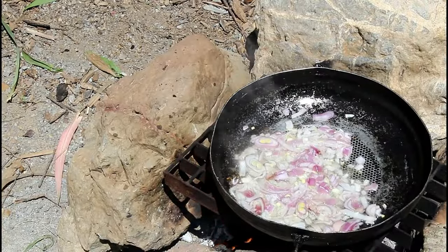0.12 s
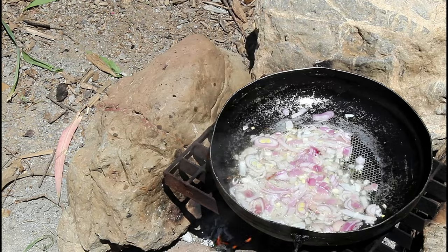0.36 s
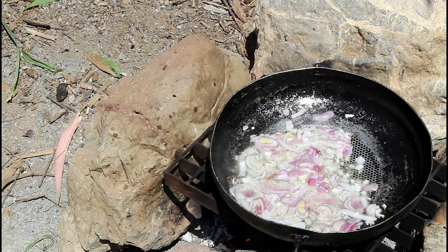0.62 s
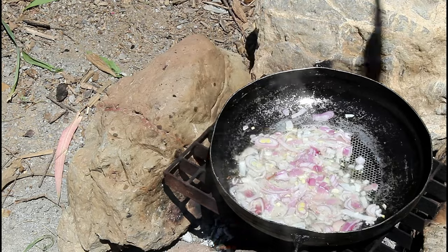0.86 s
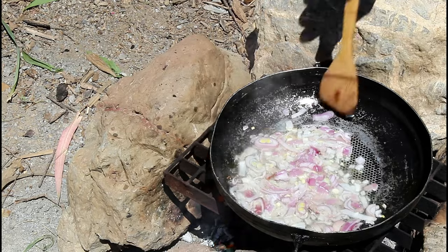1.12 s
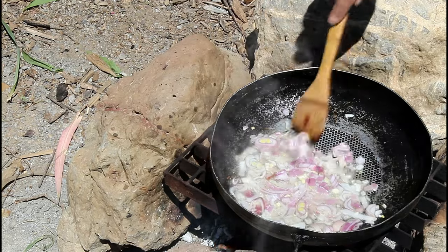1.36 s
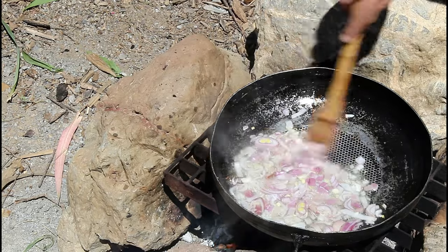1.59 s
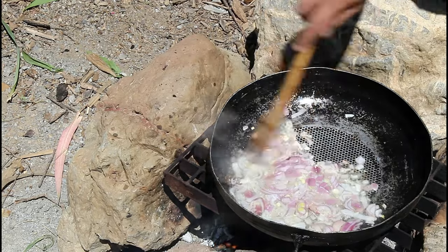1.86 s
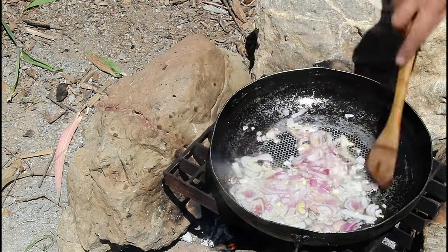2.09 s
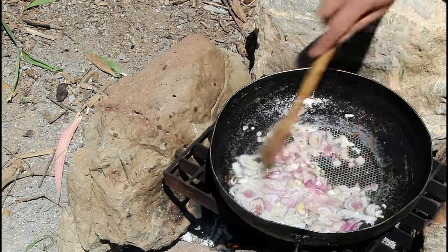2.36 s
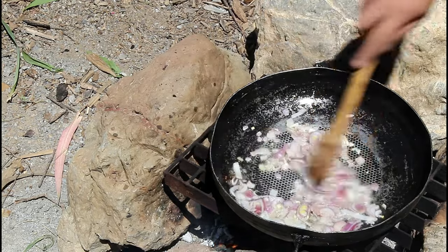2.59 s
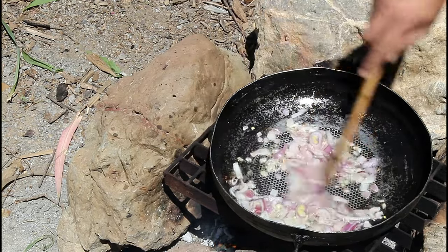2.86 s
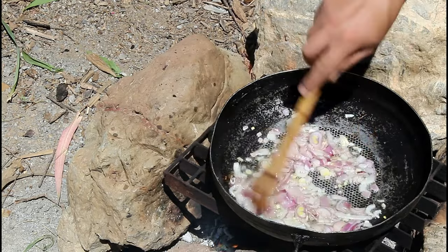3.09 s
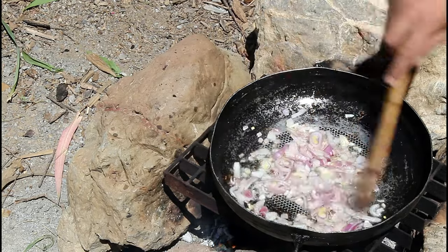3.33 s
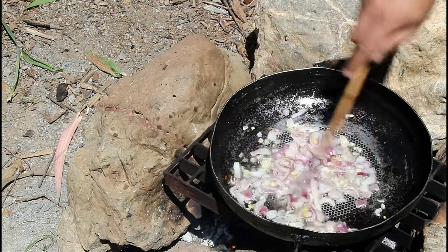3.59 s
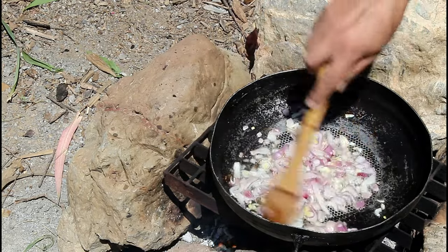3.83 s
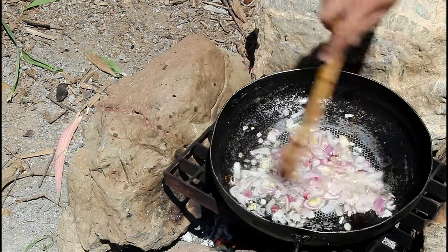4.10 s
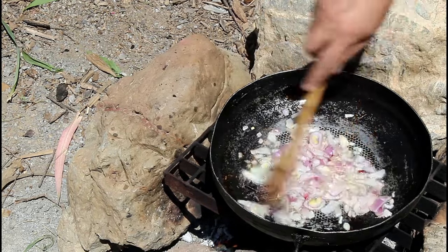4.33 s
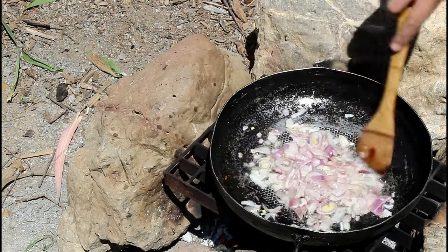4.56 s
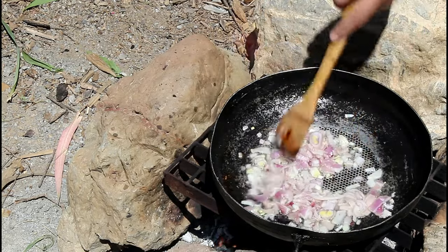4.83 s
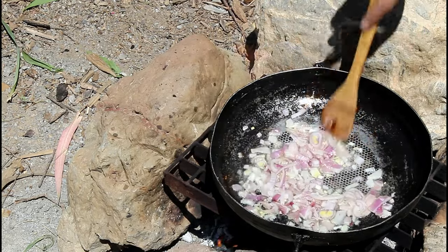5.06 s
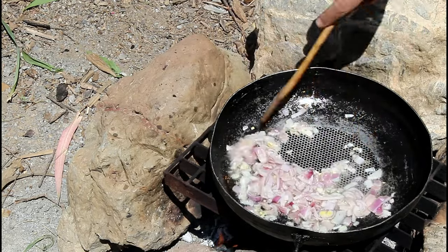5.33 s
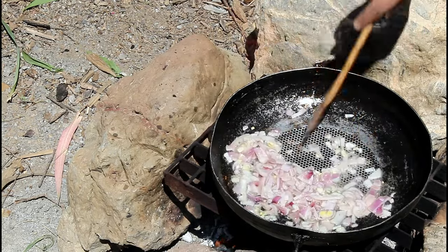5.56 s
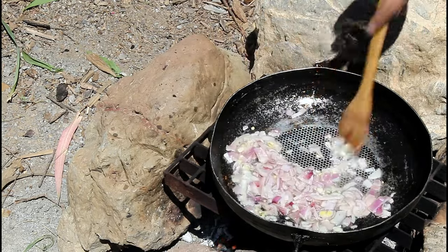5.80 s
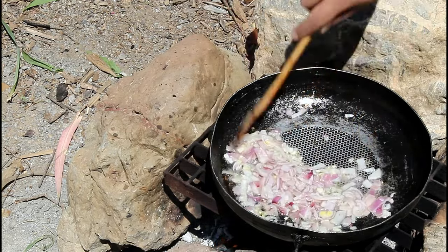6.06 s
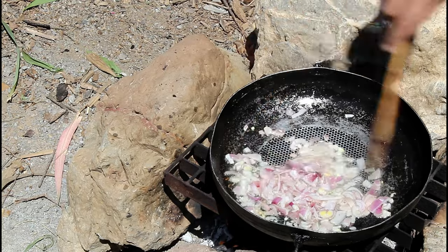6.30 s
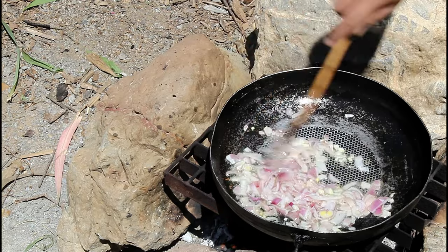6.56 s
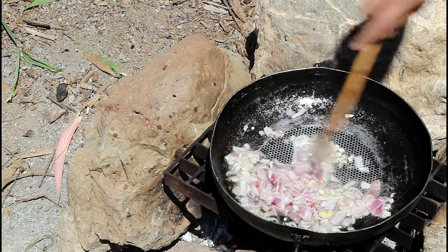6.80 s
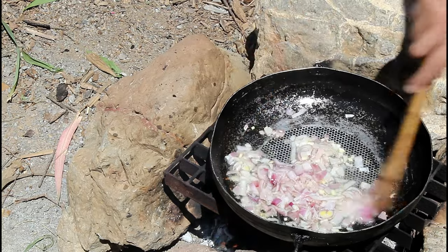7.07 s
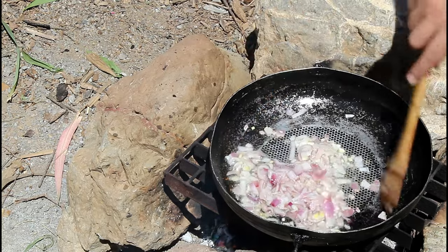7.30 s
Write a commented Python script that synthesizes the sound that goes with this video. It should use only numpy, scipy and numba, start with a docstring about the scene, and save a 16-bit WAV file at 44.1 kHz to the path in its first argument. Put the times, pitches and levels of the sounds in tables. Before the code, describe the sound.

A close, mono outdoor sound of chopped onions frying in oil in a metal pan over a fire, about 7.4 seconds. A bright steam hiss with dense fine crackle runs throughout, over a soft low open-air rumble. Small pops and light scrapes open it; a strong wooden knock lands at 0.8 s, followed by a quick cluster of spatula taps to 1.25 s and a very sharp oil snap near 1.2 s. From 1.6 to 5 s the sizzle swells and dips gently, with sparser knocks at 1.9, 2.8, 3.9 and 4.3 s, short rasping scrapes and scattered spits, one crisp at 3.3 s. Around 5.2 s a low wind gust buffets; a heavy knock at 5.4 s brings a surge of frying. Scrapes follow to 6.15 s, with loud snaps at 6.2 and 6.9 s, thick popping, and knocks at 5.8, 6.75 and 7.4 s. The pan's ring is short and muted.

```python
"""Dense fizz and crackle of chopped onions frying in oil, close by, in a pan over an outdoor fire.
Steam is filtered noise; crackle and single pops are damped rising rings that echo in the bowl.
A wooden spatula knocks and scrapes: short pushes and stick-slip ticks ring the food-damped pan's modes.
Filtered noise underneath gives the open-air rumble and light wind on the microphone."""
import sys
import numpy as np
from scipy import signal
from scipy.fft import rfft, irfft
from scipy.io import wavfile
from scipy.ndimage import uniform_filter1d
from numba import njit

SR = 44100
rng = np.random.default_rng(int(sys.argv[2]) if len(sys.argv) > 2 else 0)


def to_wav(sig):
    """Store sig (one row per channel, or 1-D mono) as 16-bit WAV at the path in sys.argv[1].

    Samples outside -1..1 are clipped; the rate is SR.
    """
    pcm = np.clip(np.atleast_2d(sig), -1, 1) * 32767
    pcm = np.round(pcm).astype(np.int16)
    wavfile.write(sys.argv[1], SR, pcm.T)  # frames by channels


def decibels_to_gain(level_db):
    """Convert a level in decibels to a linear amplitude gain (20 dB per decade)."""
    exponent = np.asarray(level_db, float) / 20
    return 10 ** exponent


N = 327170  # length in samples


def level(x, db):
    """Scale to an rms level in dB."""
    return x * decibels_to_gain(db) / np.sqrt(np.mean(x ** 2))


def curve(rows):
    """Gain over time from (s, dB) rows."""
    s, db = np.transpose(rows)
    return decibels_to_gain(np.interp(np.arange(N) / SR, s, db))


def colour(x, points):
    """Causal minimum-phase filter with the given (Hz, dB) response."""
    hz, db = np.transpose(points)
    f = np.maximum(np.arange(1025) * SR / 2048, 1)
    log_gain = np.log(decibels_to_gain(np.interp(np.log(f), np.log(hz), db)))
    # folding the cepstrum onto positive times makes the filter causal
    cepstrum = irfft(log_gain)
    cepstrum[1:1024] *= 2
    cepstrum[1025:] = 0
    impulse = irfft(np.exp(rfft(cepstrum)))
    return signal.fftconvolve(x, impulse)[:len(x)]


def band(x, hz, spread):
    """Band-pass from hz / spread to hz * spread."""
    sos = signal.butter(2, [hz / spread, hz * spread], "band", fs=SR, output="sos")
    return signal.sosfilt(sos, x)


def walk(rate):
    """Random levels held 1 / rate s and slewed twice."""
    hold = int(SR / rate)
    steps = np.repeat(rng.standard_normal(N // hold + 1), hold)
    return uniform_filter1d(uniform_filter1d(steps, hold), hold)[:N]


def wind():
    """A faint breeze with a few gusts that rise, fall and buffet unevenly."""
    # gusts on the microphone, before buffeting: peak_s, level_db
    gusts = [(1.0, -60), (4.95, -55), (5.23, -45.5), (5.56, -48.5), (5.72, -57), (6.5, -60)]
    breeze_db, buffet_db = -70, 4.5
    rise_s, fall_s = 0.074, 0.07  # time constants
    t = np.arange(N) / SR
    gain = decibels_to_gain(breeze_db)
    for s, db in gusts:
        gain = gain + decibels_to_gain(db) * np.exp(np.minimum((t - s) / rise_s, (s - t) / fall_s))
    return gain * decibels_to_gain(buffet_db * walk(21))


def outdoors():
    """Steady rumble of fire and open air, and low noise for gusts buffeting the microphone."""
    # spectrum of the open-air rumble: frequency_hz, relative_db_per_hz
    air_spectrum = [(30, -20), (65, -6), (138, 3), (370, 1), (730, 1.5), (900, -2), (1500, 0), (2300, -3),
                    (3200, -15), (6000, -46)]
    rumble = colour(rng.standard_normal(N), air_spectrum)
    air = level(rumble * decibels_to_gain(0.38 * walk(12)), -46)
    gust = band(rng.standard_normal(N), 51.6, 2.1)
    return air + wind() * level(gust, 0)


def pan(force, damp):
    """The pan's modes, rung by a force; damp below 1 shortens them, as food on the metal does."""
    # modes before damp shortens their ring: frequency_hz, level_db, t60_s
    modes = [(311, 14.5, 0.083), (444, 17, 0.048), (518, 17.5, 0.026), (670, 6, 0.08), (733, 9, 0.038),
             (1020, -2, 0.068), (1188, -5.5, 0.1), (1426, -1.5, 0.062), (1610, 2, 0.028),
             (1875, 3.5, 0.031), (2213, 9.5, 0.0066), (3360, -3, 0.039), (3600, 0, 0.019)]
    out = 0
    for k, (hz, db, t60) in enumerate(modes):
        pole = np.exp(2j * np.pi * hz / SR - np.log(1000) / (damp * t60 * SR))
        ring = signal.lfilter([1], [1, -pole], force).imag
        # neighbouring modes move in opposite sense
        out = out + (-1) ** k * decibels_to_gain(db) * ring
    return out


def scrape():
    """Uneven stick-slip ticks of the wooden edge drive the damped pan during each stroke."""
    # spatula dragged over the pan: start_s, length_s, level_db (rms, with ring-out), rasp_centre_hz
    strokes = [(0.302, 0.13, -47.5, 850), (0.819, 0.053, -46.5, 564), (1.216, 0.087, -43.5, 695),
               (1.597, 0.036, -46, 1070), (1.885, 0.11, -55, 640), (2.187, 0.059, -52, 720),
               (2.799, 0.09, -45, 620), (3.876, 0.097, -48, 644), (4.315, 0.081, -49.5, 1020),
               (5.082, 0.15, -44, 890), (5.416, 0.086, -43, 606), (5.494, 0.035, -43.5, 790),
               (5.823, 0.082, -45.5, 860), (5.854, 0.081, -39, 1120), (6.147, 0.061, -44, 1360),
               (6.996, 0.028, -69, 686), (7.123, 0.051, -39, 720)]
    out = np.zeros(N + SR)
    slip_now = rng.random(N) < 700 / SR  # 700 slips per second on average
    slips = rng.standard_normal(N) * slip_now * decibels_to_gain(2.5 * walk(77))
    for s, length_s, db, hz in strokes:
        start, n = int(s * SR), int(length_s * SR)
        drag = np.zeros(n + SR // 20)  # room for the pan to ring out
        drag[:n] = slips[start:start + n] * signal.windows.tukey(n, .8)
        force = np.diff(band(drag, hz, 1.53), prepend=0)
        out[start:start + len(drag)] += level(pan(force, damp=0.44), db)
    return out[:N]


def knocks():
    """A one-cycle thump and click, the pan's short ring, and a fading rattle as the wood settles."""
    # wood on pan and stones: start_s, peak_db (before the final high-pass), contact_pitch_hz
    blows = [(0.3167, -27, 1030), (0.5937, -31.5, 1450), (0.8035, -7, 880), (0.9236, -32, 670),
             (0.9639, -25, 1750), (0.9739, -10, 480), (1.0858, -30, 1390), (1.156, -19, 905),
             (1.2127, -12, 1390), (1.224, -14, 1120), (1.584, -30, 580), (1.6134, -34.5, 1070),
             (1.8707, -16.5, 505), (2.7971, -26, 580), (3.8934, -29.5, 540), (4.3161, -30.5, 480),
             (5.0818, -24.5, 915), (5.3898, -6, 650), (5.7919, -14.5, 1020), (6.0651, -27.5, 1640),
             (6.1132, -25.5, 495), (6.7408, -13, 770), (7.006, -33, 1250), (7.0755, -29.5, 590),
             (7.3882, -14, 770)]
    tick_hz, tick_db = 2440, -13.5  # the hard edge of the wood clicks as it lands
    # the rattle grows less than the blow: dB at a full-scale blow, dB gained per dB of softer blow
    rattle_s, rattle_db, rattle_per_db = 0.013, -26.5, 1.04
    out, t = np.zeros(N + SR), np.arange(int(.2 * SR)) / SR
    tick = np.sin(2 * np.pi * tick_hz * t) * np.exp(-t / 0.00065)
    for (s, db, hz), chance in zip(blows, rng.standard_normal((len(blows), len(t)))):
        # a harder contact is a shorter push and wakes the higher modes
        u = (t * hz - .4) * 6.02
        thump = u * np.exp(-u ** 2 / 2)
        # cubing leaves only the rare large jolts: the edge bounces rather than rubs
        rattle = band(chance ** 3 * np.exp(-(t / rattle_s) ** 2), hz, 2.07)
        ring = pan(np.diff(thump, prepend=0), damp=1.0)
        shake = pan(np.diff(rattle, prepend=0), damp=0.47)
        hit = thump + decibels_to_gain(tick_db) * tick
        hit += decibels_to_gain(-10.5) * ring / np.abs(ring).max()
        hit += decibels_to_gain(rattle_db - rattle_per_db * db) * shake / np.abs(shake).max()
        start = int(s * SR)
        out[start:start + len(t)] += decibels_to_gain(db) * hit / np.abs(hit).max()
    return signal.sosfilt(signal.butter(2, 140, "high", fs=SR, output="sos"), out[:N])


@njit
def bubbles(n, start, hz, cycles, size, glide):
    """Each bubble is a damped ring, scaled to its first crest, whose pitch climbs as it opens."""
    out = np.zeros(n)
    for k in range(len(start)):
        w = 2 * np.pi * hz[k] / SR  # radians per sample
        fade = np.exp(-hz[k] / SR / cycles[k])
        a, phase = size[k] * np.exp(.25 / cycles[k]), 0.
        end = min(n, int(start[k] + 6 * cycles[k] * SR / hz[k]) + 2)
        for i in range(int(start[k]), end):
            out[i] -= a * np.sin(phase)
            phase += min(w, 2.8)  # stays below half the sample rate
            w *= 1 + glide * (1 - fade)
            a *= fade
    return out


def bowl(x, wet_db, t60_s):
    """The curved pan wall throws back a brief dense echo, a different one for bursts at each new spot."""
    # a new random echo for every 20 ms of sound
    step, t = SR // 50, np.arange(SR // 20) / SR
    slices = np.pad(x, (0, -len(x) % step)).reshape(-1, step)
    decay = np.exp(-np.log(1000) * t / t60_s) * (t > .0004)
    echoes = rng.standard_normal((len(slices), len(t))) * decay
    echoes /= np.sqrt(np.sum(echoes ** 2, axis=1, keepdims=True))
    wet = np.zeros(len(x) + step + len(t))
    for k, part in enumerate(signal.fftconvolve(slices, echoes, axes=1)):
        wet[k * step:k * step + len(part)] += part
    return x + decibels_to_gain(wet_db) * wet[:len(x)]


def heat():
    """How hard it fries, as a gain over time that also swells and sinks by chance."""
    # flares when wet onion is turned onto hot oil; before the chance swell: time_s, fizz_level_db
    flares = [(0.0, -45.5), (1.13, -46), (1.2, -42.5), (1.37, -44.5), (1.63, -43), (1.83, -46.5),
              (2.14, -42.5), (2.43, -46), (2.81, -42), (3.23, -42.5), (3.4, -45), (4.34, -43), (4.6, -44.5),
              (5.16, -42), (5.38, -44), (5.41, -35), (5.6, -37.5), (5.9, -39), (6.0, -43), (6.78, -40.5),
              (6.95, -44), (7.12, -41.5), (7.41, -43.5)]
    wander_db, wander_per_s = 1.36, 9
    return curve(flares) * decibels_to_gain(wander_db * walk(wander_per_s))


def swarm(count, spread_db, low_hz, high_hz, turns):
    """Many bubbles at random moments; a few are far larger than the rest."""
    u = rng.random((count, 4)).T
    size = decibels_to_gain(np.minimum(-spread_db * np.log(1 - u[1]), 4.5 * spread_db))
    hz = low_hz * (high_hz / low_hz) ** u[2]
    cycles = turns * decibels_to_gain(3.4 * (u[3] - 2.0))
    return bubbles(N, u[0] * N, hz, cycles, size, 0.2)


def sizzle(fry):
    """A steam hiss that flickers band by band, fine crackle and sparser ringing bubbles share the heat."""
    # spectrum of the steam hiss: frequency_hz, relative_db_per_hz
    steam_spectrum = [(700, -36.5), (1500, 1.5), (2500, -2), (3500, 4), (5000, 2.5), (8000, 3), (12000, 8),
                      (15000, -1.5), (17000, 4)]
    together = 0.23 * walk(55)  # dB, a flicker common to all bands
    steam = 0
    for hz in (900, 1800, 3600, 7200, 14400):
        hiss = band(rng.standard_normal(N), hz, 1.45) / np.sqrt(hz)
        steam = steam + hiss * decibels_to_gain(together + 2.4 * walk(150))
    crackle = swarm(count=11000, spread_db=4.5, low_hz=3470, high_hz=12600, turns=0.91)
    rings = swarm(count=2000, spread_db=3.0, low_hz=1936, high_hz=11000, turns=4.4)
    # small bursts radiate their treble best
    crackle = signal.lfilter([1, -1], [1, -.3], crackle)
    grains = level(crackle, -2.5) + level(rings, -11)
    hiss = level(colour(steam, steam_spectrum), -1.1)
    return fry * (hiss + bowl(grains, wet_db=-7.0, t60_s=0.0056))


def spits(fry):
    """Rows of middling bursts at random moments, louder when it fries harder."""
    above_fizz_db, scatter_db = 15, 1  # first crest, before the radiation filter and echoes
    low_hz, high_hz, middle_cycles = 5000, 12400, 3.9
    u = rng.random((50, 4)).T
    fizz_db = 20 * np.log10(fry[(u[0] * N).astype(int)])
    db = fizz_db + above_fizz_db + scatter_db * (2 * u[1] - 1)
    hz = low_hz * (high_hz / low_hz) ** u[2]
    cycles = middle_cycles * 2 ** (2 * u[3] - 1)
    return u[0] * N / SR, db, hz, cycles


def pops(fry):
    """The single bursts, large and middling: a close echo off the wall, then a longer spray of droplets."""
    # bursts that stand out: start_s, crest_db (before filter and echoes), starting_pitch_hz, ring_cycles
    large = [(0.2098, -22.5, 6200, 1.4), (0.5329, -24, 5270, 7.7), (0.5937, -20.5, 2180, 0.48),
             (0.656, -23.5, 1680, 0.75), (0.733, -31.5, 4250, 11.4), (0.8041, -17, 3700, 2),
             (0.917, -22, 5800, 1.6), (0.9637, -18.5, 2740, 3.5), (0.9716, -13, 3000, 0.52),
             (0.9782, -10.5, 5300, 0.32), (1.05, -14, 4600, 3.5), (1.0858, -18.5, 1530, 1.8),
             (1.1636, -21, 4400, 0.8), (1.1743, 0.5, 7450, 0.49), (1.2125, -12, 2600, 1.8),
             (1.217, -15, 2560, 1.7), (1.23, -14, 7540, 0.54), (1.3527, -8.5, 7950, 0.5),
             (1.414, -12.5, 8400, 2.2), (1.5076, -19, 3600, 0.85), (1.665, -17.5, 5200, 3.6),
             (1.9019, -16.5, 3750, 3.4), (1.9753, -22, 3300, 0.82), (2.0976, -9, 8750, 0.48),
             (2.437, -19, 4600, 0.3), (2.6136, -18, 10000, 0.98), (2.671, -10, 9200, 0.59),
             (2.847, -18.5, 8300, 3), (2.8667, -20, 12600, 1.8), (3.153, -33, 6200, 7),
             (3.1955, -30, 7300, 8), (3.2055, -28.5, 5800, 8), (3.2555, -21, 8300, 3.5),
             (3.2689, -6, 9200, 0.47), (3.5988, -27, 4530, 9.6), (3.8056, -20, 4100, 8.1),
             (4.0815, -16, 10500, 1.1), (4.2818, -25, 5900, 6.4), (4.3332, -12.5, 3600, 0.28),
             (4.4588, -22, 6900, 4), (4.511, -15.5, 5800, 0.31), (4.909, -27.5, 4000, 5.7),
             (4.9135, -17, 2900, 0.51), (5.1718, -19, 10000, 1.1), (5.4243, -21, 5850, 0.64),
             (5.4747, -12.5, 4700, 0.33), (5.657, -8.5, 9100, 0.33), (5.7086, -8.5, 5460, 0.24),
             (5.825, -12, 9800, 0.51), (5.9106, -12, 8800, 0.5), (5.9874, -12.5, 9600, 0.89),
             (6.0656, -14, 3180, 0.32), (6.0753, -11, 9050, 0.41), (6.177, 2.5, 7000, 0.25),
             (6.3562, -13, 11500, 1.3), (6.362, -13, 9400, 0.52), (6.3839, -10, 6800, 0.32),
             (6.4793, -9.5, 8900, 0.36), (6.4955, -12, 11300, 0.66), (6.5252, -13.5, 10000, 0.9),
             (6.6718, -14.5, 9700, 2), (6.7624, -20, 5000, 3), (6.869, -17, 3200, 0.73),
             (6.8799, 1.5, 8400, 0.57), (6.942, -26, 6100, 4.9), (7.018, -12, 8700, 0.64),
             (7.0843, -12.5, 10200, 0.69), (7.1193, -13, 8700, 0.39), (7.228, -26.5, 3720, 4.3),
             (7.27, -15, 8100, 0.32), (7.3328, -27.5, 4300, 5.3)]
    s, db, hz, cycles = np.hstack([np.transpose(large), spits(fry)])
    burst = bubbles(N, s * SR, hz, np.maximum(cycles, .35), decibels_to_gain(db), 0.068)
    # small sources radiate the low end poorly
    burst = signal.lfilter([1, -1], [1, -.8], burst)
    burst = bowl(burst, wet_db=-6.5, t60_s=0.0073)
    return bowl(burst, wet_db=-10.0, t60_s=0.13)


def scene():
    """All sources, one channel."""
    fry = heat()
    mix = outdoors() + scrape() + knocks() + sizzle(fry) + pops(fry)
    return mix[None]


def band_limit(x):
    """A steep low-pass at the top of the band."""
    return signal.sosfilt(signal.butter(12, 16640, fs=SR, output="sos"), x)


def record(dry):
    """The top treble falls away steeply above 15 kHz, with a narrow dip lower down; loud peaks round off."""
    # overall treble response: frequency_hz, gain_db
    treble = [(11000, -0.5), (14000, 2), (15300, -3.5), (15800, -14), (16500, -43)]
    notch_hz, ceiling = 11300, 1.05  # peaks round off towards the ceiling
    b, a = signal.iirnotch(notch_hz, 60, fs=SR)
    toned = colour(signal.lfilter(b, a, dry[0]), treble)[None]
    mix = ceiling * np.tanh(toned / ceiling)
    return band_limit(mix)


dry = scene()
out = record(dry)
to_wav(out)
```